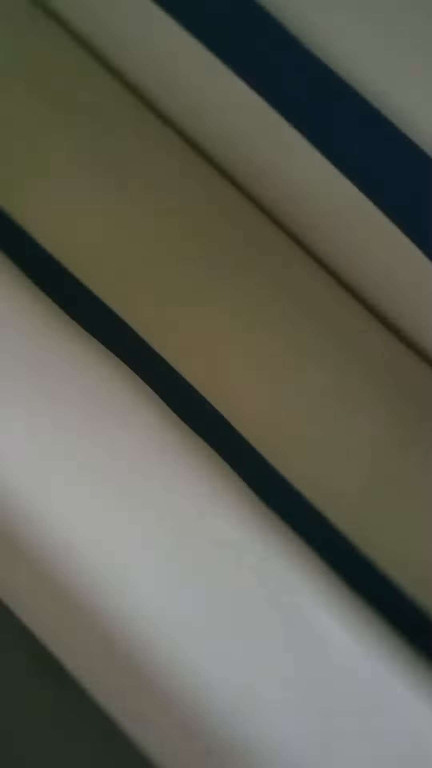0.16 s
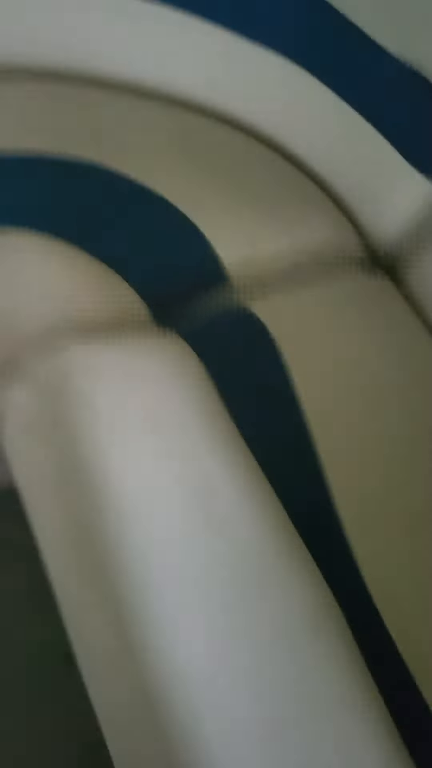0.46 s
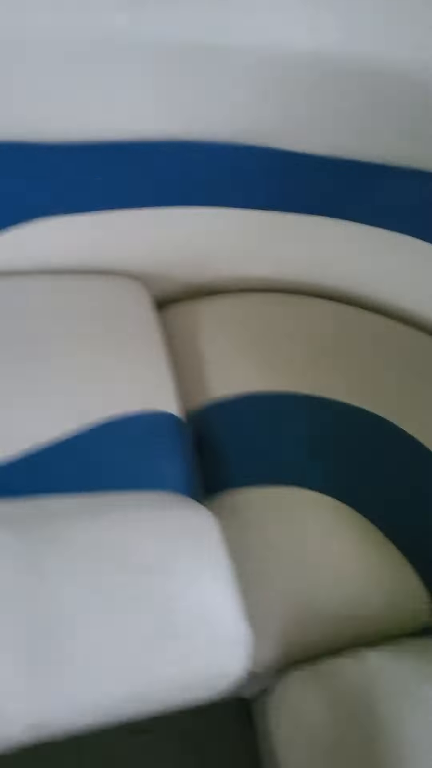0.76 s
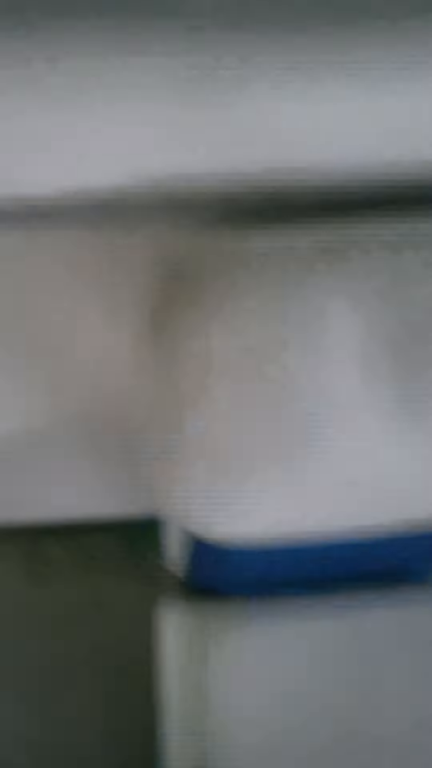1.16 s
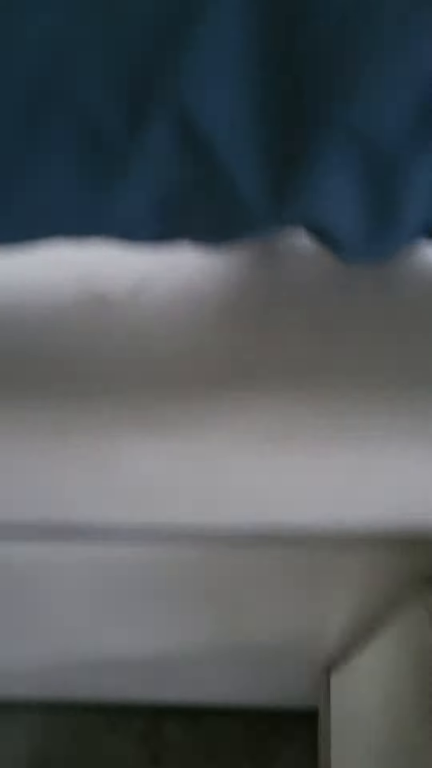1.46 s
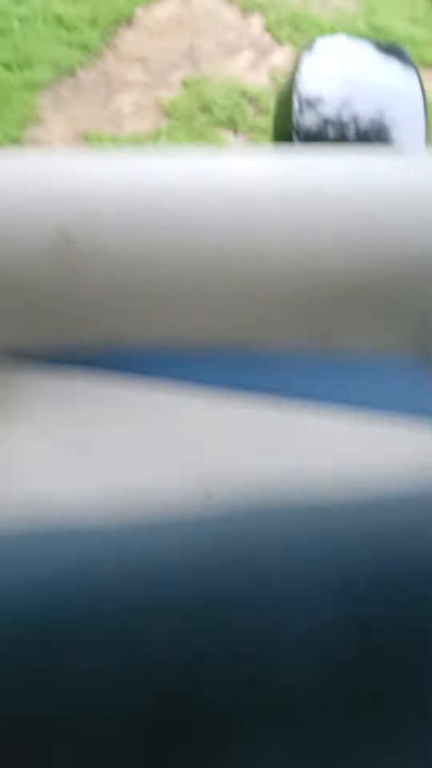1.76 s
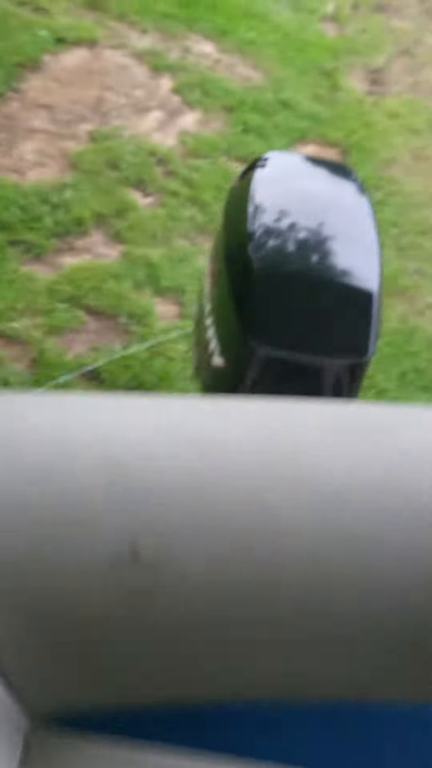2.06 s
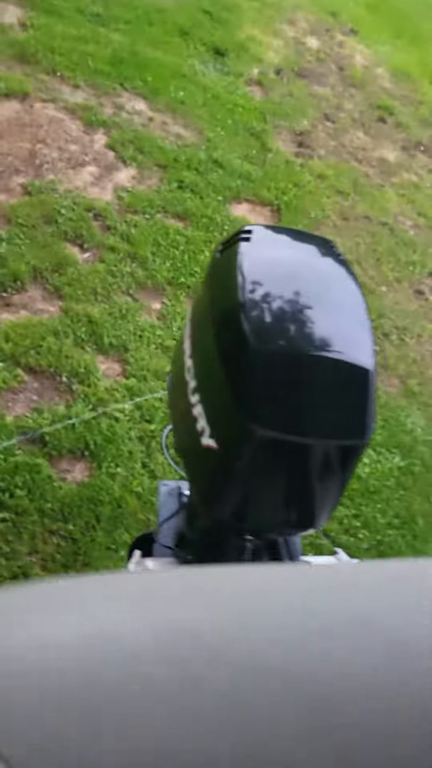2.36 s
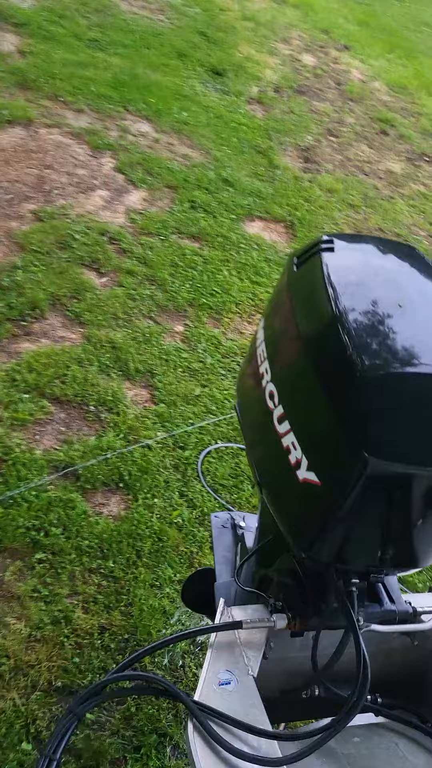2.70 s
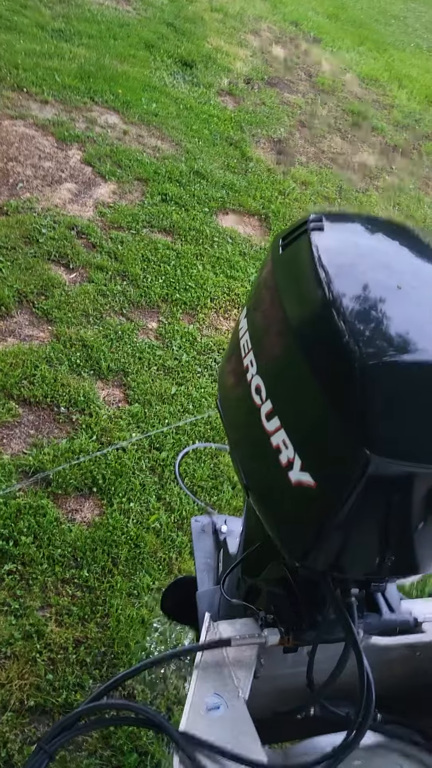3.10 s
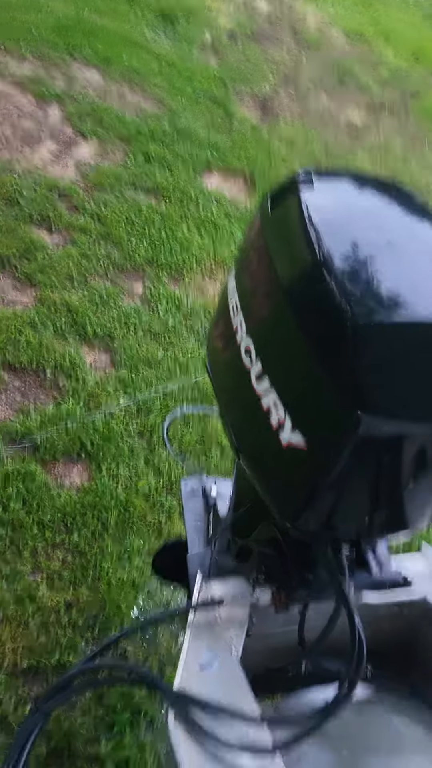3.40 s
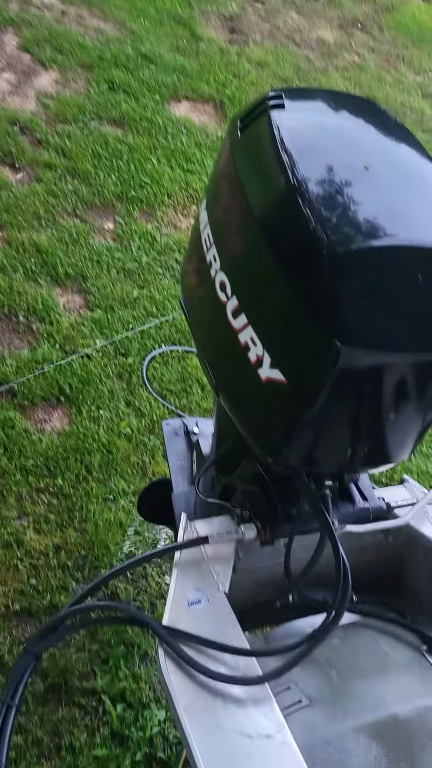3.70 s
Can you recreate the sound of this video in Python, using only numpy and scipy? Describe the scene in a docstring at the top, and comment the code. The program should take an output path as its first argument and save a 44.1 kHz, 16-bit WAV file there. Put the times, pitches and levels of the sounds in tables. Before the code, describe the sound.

An outboard motor idles throughout, its fast low throb at about 26 pulses a second under valve clatter, burbling exhaust and hiss. From 0.25 s a loose part clanks roughly every 0.15 s, ringing in two tones, strongest near 2.8 s. A hand ticks the camera at 0.83 s and scuffs it at 2.16 s. Around 2 s the clatter, hiss and fine water spray open up brighter, continuing to the end at 3.85 s.

```python
"""A four-cylinder outboard motor idles on a trailer: exhaust pulses throb in the leg and the valve gear
clatters at each firing. A handheld camera starts over the boat seats and swings to the stern, so the treble
of clatter, hiss and cooling water opens up. Soon a loose part clanks, mostly once an engine cycle, as two
ringing tones. The hand then ticks once on the camera, a press and a snap, and later scuffs it once with noise."""
import sys
import numpy as np
from scipy import signal
from scipy.fft import rfft, irfft, next_fast_len
from scipy.io import wavfile
from scipy.ndimage import uniform_filter1d, map_coordinates

SR = 44100
rng = np.random.default_rng(int(sys.argv[2]) if len(sys.argv) > 2 else 0)


def to_wav(s):
    """Save 16-bit WAV."""
    ch = np.atleast_2d(s).T  # columns
    pcm = np.round(np.clip(ch, -1, 1) * 32767)  # PCM
    wavfile.write(sys.argv[1], SR, pcm.astype(np.int16))


def volts_from_db(level):
    """Convert decibel levels to linear amplitude ratios."""
    exponent = np.asarray(level, float) / 20
    return 10 ** exponent


N = 169785
T = np.arange(N) / SR  # seconds
CYLINDERS = 4
CLATTER_EARLY = 0.0806  # how far the noises run ahead of the throb, in firing intervals

# Idle speed of the motor. Each row: time in seconds, firings per second.
FIRING_RATE = [(0.0, 25.15), (0.226, 25.93), (0.453, 26.57), (0.679, 25.91), (0.906, 26.34), (1.132, 26.48),
               (1.359, 26.45), (1.585, 26.49), (1.812, 26.14), (2.038, 26.08), (2.265, 26.16),
               (2.491, 26.29), (2.718, 26.72), (2.944, 26.44), (3.171, 26.23), (3.397, 27.33),
               (3.624, 26.6), (3.85, 25.9)]


def unit(x):
    """Scales x to an average (rms) strength of 1."""
    return x / np.sqrt(np.mean(x ** 2) + 1e-20)


def along(points, hz):
    """Reads a curve of (Hz, value) points on a log frequency axis."""
    f, v = np.transpose(points)
    return np.interp(np.log(hz + 1), np.log(f + 1), v)


def curves(rows):
    """One value per sample for each column after the time."""
    s, *cols = np.transpose(rows)
    return [np.interp(T, s, c) for c in cols]


def filtered(x, response):
    """Filters x by a complex response that depends on frequency."""
    m = next_fast_len(N + 8192)
    return irfft(rfft(x, m) * response(np.fft.rfftfreq(m, 1 / SR)), m)[..., :N]


def resonance(hz, centre_hz, width_hz):
    """Response of a part that rings after being struck, with gain 1 at its centre."""
    return 1j * hz * width_hz / (centre_hz ** 2 - hz ** 2 + 1j * hz * width_hz)


def blow(t, rise_s, t60):
    """A rise, then a decay of 60 dB in t60 seconds; silent before time 0."""
    t = np.maximum(t, 0)
    return (1 - np.exp(-t / rise_s)) * volts_from_db(-60 * t / t60)


def left_right(db):
    """Gains for the left and right ports that differ by db."""
    return volts_from_db([[db / 2], [-db / 2]])


def spread(pair):
    """Mixes two unrelated signals, one shared and one opposed, into what the left and right ports hear."""
    # Likeness of the two microphone ports. Each row: frequency in Hz, likeness from -1 to 1.
    alike = [(60, 0.39), (250, 0.96), (500, 0.44), (1100, -0.06), (4000, -0.12)]
    # Balance of the two ports. Each row: frequency in Hz, left over right in dB.
    port_balance = [(300, -1.5), (950, 3.5), (1900, 0.5), (3600, 0), (5500, -5), (12000, -4.5)]

    def shares(hz):
        angle = np.arccos(np.clip(along(alike, hz), -1, 1)) / 2
        return np.array([np.cos(angle), np.sin(angle)])

    mid, side = filtered(pair, shares)
    ports = np.array([mid + side, mid - side])
    return filtered(ports, lambda hz: volts_from_db(np.outer([.5, -.5], along(port_balance, hz))))


def rush(spectrum, patchy_db):
    """A noise pair of rms 1 whose gain varies in random patches of time and pitch."""
    z = signal.stft(rng.standard_normal((2, N)), nperseg=512)[2]
    field = rng.standard_normal(z.shape[1:])
    for axis in (0, 1):
        field = uniform_filter1d(field, size=5, axis=axis)
    pair = signal.istft(z * volts_from_db(patchy_db * unit(field)), nperseg=512)[1][:, :N]
    return unit(filtered(pair, lambda hz: volts_from_db(along(spectrum, hz))))


def turns():
    """Firing count, summed from the firing rate: a whole number at each firing."""
    first_firing = .512  # firing intervals before the first firing
    return np.cumsum(curves(FIRING_RATE)[0]) / SR - first_firing + CYLINDERS


def puffs(count, t60, rise_s, scatter_db):
    """An envelope that rises at each firing to a new random height and dies away."""
    whole = count.astype(int)
    size = volts_from_db(scatter_db * rng.standard_normal(whole[-1] + 1))
    period = 1 / curves(FIRING_RATE)[0]
    since = (count - whole) * period
    latest = size[whole] * blow(since, rise_s, t60)
    previous = size[whole - 1] * blow(since + period, rise_s, t60)
    return latest + previous


def exhaust(count):
    """Overtones of the firing rate, lagging as the pipe makes them; each firing has its own size."""
    # Exhaust throb at the moving camera. Each row: time in seconds, then the levels of
    # the 2nd, 3rd, 4th, 5th, 6th and 7th overtone in dB.
    throb = [(0, -45, -17.5, -31.5, -26.5, -62, -37), (.55, -17.5, -22.5, -21.5, -30.5, -49, -47.5),
             (.8, -22.5, -23, -23, -33.5, -39.5, -70), (1.35, -18.5, -22, -26.5, -29, -45, -43.5),
             (1.8, -21, -18.5, -23, -27, -75, -39.5), (2.2, -21, -17.5, -21, -25, -53, -40.5),
             (2.95, -21, -18.5, -22, -27.5, -39, -57), (3.4, -22, -18.5, -23, -29.5, -37.5, -40),
             (3.85, -22.5, -18, -24, -29.5, -34, -49)]
    pipe_hz, pipe_width_hz = 58, 17
    jitter_turns = .006  # how early or late a firing comes, in firing intervals
    scatter_db, pan_db, lead_s = 0.81, 1.86, 0.00011

    rate = curves(FIRING_RATE)[0]
    jitter = rng.standard_normal(int(count[-1]) + 2)
    count = count + jitter_turns * map_coordinates(jitter, [count])
    wave = 0
    for k, level_db in enumerate(curves(throb), 2):
        lag = np.angle(resonance(k * rate.mean(), pipe_hz, pipe_width_hz))
        wave = wave + volts_from_db(level_db) * np.cos(2 * np.pi * k * count + lag)
    size_db = scatter_db * rng.standard_normal(int(count[-1]) + 2)
    # the root of 2 makes each overtone level an rms level
    wave = np.sqrt(2) * wave * volts_from_db(map_coordinates(size_db, [count - .25]))
    side = np.array([[.5], [-.5]])  # left, right
    return filtered(wave, lambda hz: volts_from_db(side * pan_db) * np.exp(2j * np.pi * hz * side * lead_s))


def burble(count, levels_db):
    """Exhaust gas pops, then bubbles through the cooling water and rings its chamber at each firing."""
    # Resonances of the exhaust water chamber. Each row: frequency in Hz, width in Hz.
    chamber = [(277, 30), (385, 80), (465, 75)]
    puff_db, t60, scatter_db = 9, .2, 4
    pop_db, pop_late_s = 23.5, .003  # first slug of gas over the bubbles; its longest random delay

    fired = np.flatnonzero(np.diff(count.astype(int)))
    delay = (pop_late_s * SR * rng.random(len(fired))).astype(int)
    late = np.minimum(fired + delay, N - 1)
    pops = np.bincount(late, minlength=N) * volts_from_db(puff_db + pop_db)
    out = 0
    for k, (mode, level_db) in enumerate(zip(chamber, levels_db)):
        gas = 1 + volts_from_db(puff_db) * puffs(count, t60, 0.0012, scatter_db)
        # the pops go into the shared signal only
        bubbles = gas * rng.standard_normal((2, N)) + pops * [[1], [0]]
        ring = unit(filtered(bubbles, lambda f: resonance(f, *mode) ** 2))
        out = out + (-1) ** k * volts_from_db(level_db) * ring
    return out


def clatter(count, body_db, bright_db):
    """Each firing shakes every resonance of block and cowl with noise, by a different amount."""
    # Resonances of cowl and block. Each row: frequency in Hz, width in Hz,
    # level in dB relative to the clatter as the camera hears it.
    block = [(1060, 193, -8), (1447, 76, -7.5), (2365, 490, -5), (2614, 35, -15), (3310, 150, -12),
             (3636, 107, -7), (3967, 46, -13), (4270, 180, -9.5), (5726, 290, -11), (6450, 860, -8.5),
             (7790, 1220, -9)]
    # Strength of the shake from each cylinder in turn, in relative dB.
    cylinder_db = [0.5, 0.9, 3, -1]
    t60, rise_s, scatter_db = .09, .005, 4.2

    early = count + CLATTER_EARLY
    strength = volts_from_db(np.array(cylinder_db))[early.astype(int) % CYLINDERS]
    out = 0
    for centre_hz, width_hz, part_db in block:
        shake = puffs(early, t60, rise_s, scatter_db) * strength
        noise = shake * rng.standard_normal((2, N))
        ring = unit(filtered(noise, lambda f: resonance(f, centre_hz, width_hz) ** 2))
        view_db = bright_db if 5000 < centre_hz < 7000 else body_db
        out = out + volts_from_db(part_db + view_db) * ring
    return out


def clanks():
    """A loose part rings with a low and an upper tone; the two ports catch it out of step."""
    # Blows on the loose part. Each row: start in seconds, level of the low tone in dB before its lift,
    # pitch of the low tone in Hz, left over right of the low tone in dB, level of the upper tone
    # in dB before its lift.
    clank_rows = [(0.2527, -32.5, 1064, -5, -32.5), (0.4036, -33, 1205, 1, -38.5),
                  (0.559, -35.5, 1290, -1, -36.5), (0.7112, -28.5, 1073, -7, -25),
                  (0.8619, -25, 1096, 0, -35.5), (1.1638, -32.5, 1170, -8, -34),
                  (1.3135, -31.5, 1144, -1, -56), (1.47, -34, 1173, -12, -43),
                  (1.6197, -25, 1060, 7.5, -35), (1.739, -48, 1060, 0, -31), (1.7742, -37, 1060, -13, -29),
                  (1.8869, -32, 978, 9, -39), (1.922, -28.5, 1020, 2, -49), (2.0735, -33.5, 1088, 14, -34),
                  (2.231, -34, 1057, -2, -25.5), (2.384, -34, 1060, -7, -29),
                  (2.5321, -32.5, 1126, 4, -29.5), (2.682, -21, 1124, -2, -26.5),
                  (2.835, -17.5, 1060, 4, -43), (2.9844, -25, 1055, 7, -54), (3.134, -27.5, 1060, 5, -31),
                  (3.2859, -26, 1060, 12, -34), (3.431, -26.5, 1075, 4, -60),
                  (3.5833, -30, 1022, 13, -26.5), (3.7334, -26, 1060, 8, -24)]
    rise_s, low_t60, upper_t60 = 0.0047, 0.088, 0.074
    low_lift_db, upper_lift_db, upper_hz = 4, 4, 2400
    apart = 1.4 * np.array([[.5], [-.5]])  # phase in radians at the left and right port

    out, t = np.zeros((2, N + SR)), np.arange(SR // 8) / SR

    def tone(pitch_hz, phase):
        return np.sin(2 * np.pi * pitch_hz * t + phase)

    chances = rng.standard_normal((len(clank_rows), 4))
    for (s, low_db, low_hz, pan_db, upper_db), chance in zip(clank_rows, chances):
        # each tone beats with a weaker neighbour of random pitch
        partner = tone(low_hz * (1 + 0.05 * chance[0]), np.pi * chance[3] - apart)
        low = tone(low_hz, apart) + .45 * partner
        low = low * volts_from_db(low_db + low_lift_db) * blow(t, rise_s, low_t60)
        partner = tone(upper_hz * (.95 + 0.019 * chance[2]), -apart)
        upper = tone(upper_hz * (1 + 0.009 * chance[1]), apart) + 0.67 * partner
        upper = upper * volts_from_db(upper_db + upper_lift_db) * blow(t, rise_s, upper_t60)
        first = round(s * SR)
        out[:, first:first + len(t)] += low * left_right(pan_db) + upper
    return out[:, :N]


def hiss():
    """Steady, patchy noise, before it pulses with the firings."""
    # Colour of the hiss. Each row: frequency in Hz, relative level in dB per Hz.
    hiss_colour = [(350, -50), (600, 0.5), (1070, 0), (1800, -6), (2380, -8), (6430, -5), (10500, -20),
                   (13600, -49)]
    return rush(hiss_colour, patchy_db=3.5)


def water():
    """The cooling jet: fine hiss with tiny drops, random clicks, breaking on the grass."""
    # Colour of the water. Each row: frequency in Hz, relative level in dB per Hz.
    water_colour = [(5290, -39), (9000, -60), (10700, -12), (13100, 5), (15700, 0.5)]
    drops_per_s, drops_db = 810, -7  # drops on each channel; their level against the fine hiss

    falls = rng.random((2, N)) < drops_per_s / SR
    drops = falls * rng.standard_normal((2, N)) * volts_from_db(2.3 * rng.standard_normal(N))
    fizz = unit(filtered(drops, lambda hz: volts_from_db(along(water_colour, hz))))
    return unit(rush(water_colour, patchy_db=2.5) + volts_from_db(drops_db) * fizz)


def rumble():
    """Low, patchy noise under the motor."""
    # Colour of the rumble. Each row: frequency in Hz, relative level in dB per Hz.
    rumble_colour = [(25, -48), (45, -10.5), (150, 1), (210, -10.5), (560, -23.5), (1200, -38.5)]
    return volts_from_db(-34.5) * rush(rumble_colour, patchy_db=4.0)


def motor_noise(count):
    """Steady rumble, with burble, clatter, hiss and water as loud as the camera's view allows."""
    # The camera turning to the motor. Each row: time in seconds, levels of the three burble
    # resonances in dB, clatter in dB, hiss in dB, water in dB, left over right of the treble in dB.
    view = [(0, -76, -56, -46.5, -46.5, -43.5, -54, -1.5), (1, -47.5, -41.5, -41.5, -43.5, -41.5, -49, 0.2),
            (1.4, -71, -43, -41.5, -44.5, -40, -47.5, -0.7),
            (1.85, -63, -41.5, -37.5, -42, -41, -43.5, -2.2), (2.05, -65, -37.5, -35.5, -38, -39.5, -43, 1),
            (2.1, -45.5, -35.5, -42, -42, -37.5, -45, -3.5),
            (2.5, -46.5, -41.5, -44.5, -39.5, -37, -43, -3.5), (3, -41, -46, -40, -36, -36.5, -46, -3.5),
            (3.85, -46.5, -42, -35.5, -36.5, -37, -48.5, -2)]
    hiss_puff_db, hiss_t60, puff_scatter_db = 6.5, 0.045, 3

    *burble_db, clatter_db, hiss_db, water_db, tilt_db = curves(view)
    early = count + CLATTER_EARLY
    open_db = hiss_db - hiss_db.mean()
    # the hiss throbs more as it opens up
    pulses = puffs(early, hiss_t60, 0.018, puff_scatter_db)
    beat = unit(1 + volts_from_db(hiss_puff_db + open_db) * pulses)
    # the 5 to 7 kHz resonances face the stern: they swing wider than the hiss
    bright_db = -45.5 + 4.15 * open_db
    bass = rumble() + burble(early, burble_db)
    treble = clatter(count, clatter_db, bright_db)
    treble = treble + volts_from_db(hiss_db) * beat * hiss()
    treble = treble + volts_from_db(water_db) * beat ** 1.5 * water()
    return spread(bass) + spread(treble) * volts_from_db(np.outer([.5, -.5], tilt_db))


def hand():
    """A finger presses and snaps free on the camera body; later the grip scuffs along it as noise."""
    # Colour of the scuff. Each row: frequency in Hz, relative level in dB per Hz.
    scuff_colour = [(120, -30), (165, 0), (330, -6), (820, -3), (1300, -12), (3000, -24), (8000, -45)]
    tick_s, tick_db, press_t60, snap_t60 = .8313, -22, .012, .005
    scuff_s, scuff_db, scuff_rise_s, scuff_t60, scuff_pan_db = 2.156, -23, .006, .5, -4

    press = blow(tick_s - T, 1 / SR, press_t60)  # time runs backwards: it grows up to the tick
    roughness = (1 + rng.standard_normal((2, N))) / 2
    snap = blow(T - tick_s, 1 / SR, snap_t60) * roughness
    scuff = blow(T - scuff_s, scuff_rise_s, scuff_t60) * spread(rush(scuff_colour, patchy_db=3))
    return volts_from_db(tick_db) * (press - snap) + volts_from_db(scuff_db) * scuff * left_right(scuff_pan_db)


def scene():
    """Adds up the motor, its loose part and the hand on the camera."""
    count = turns()
    return exhaust(count) + motor_noise(count) + clanks() + hand()


def low_pass(x):
    """Removes everything above the highest recorded frequency."""
    return signal.sosfilt(signal.butter(12, 15860, fs=SR, output="sos"), x)


def record(dry):
    """The finished mix as it leaves the camera."""
    return low_pass(dry)


dry = scene()
out = record(dry)
to_wav(out)
```